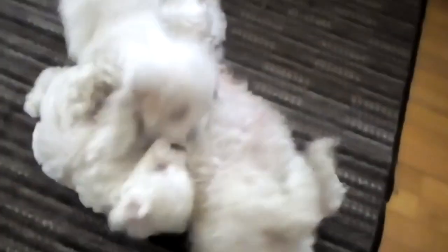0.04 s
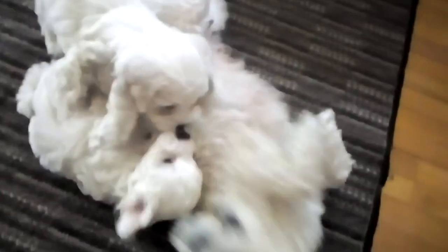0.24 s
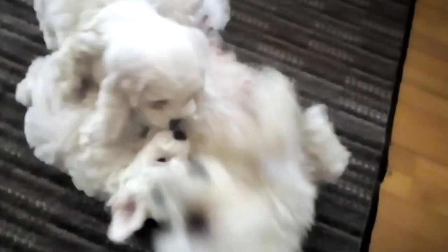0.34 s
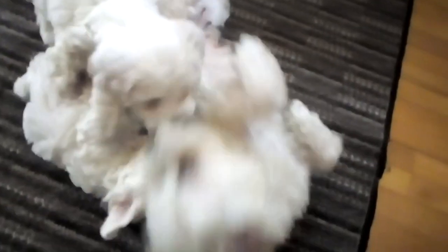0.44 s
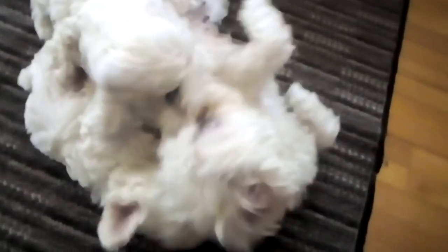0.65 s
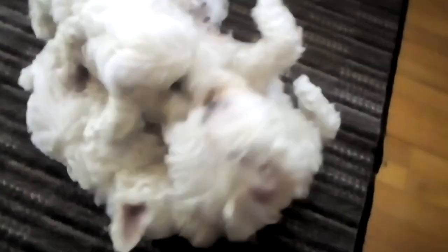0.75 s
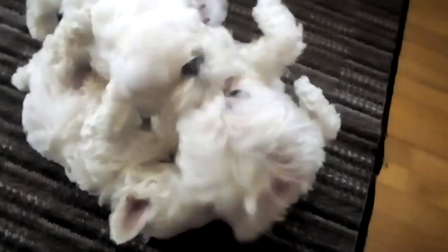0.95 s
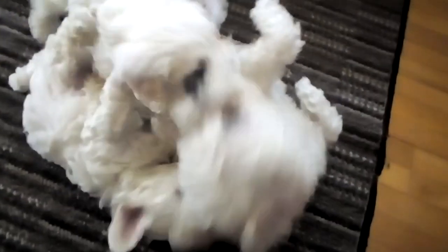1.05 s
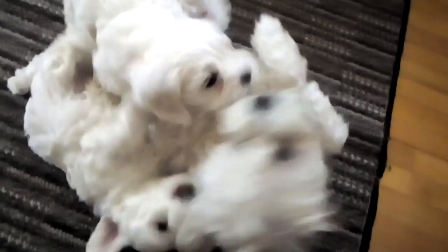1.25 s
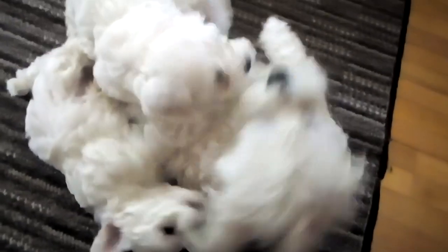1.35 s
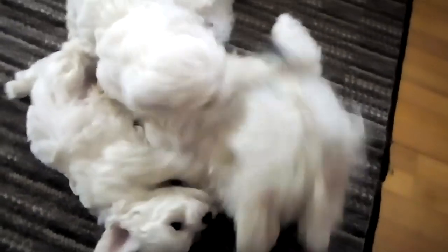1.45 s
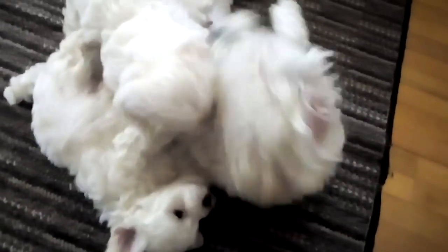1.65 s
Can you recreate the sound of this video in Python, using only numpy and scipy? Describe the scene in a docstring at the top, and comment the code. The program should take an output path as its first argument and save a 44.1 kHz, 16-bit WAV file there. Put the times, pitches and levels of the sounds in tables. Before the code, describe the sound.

Short, low snorting grunts from small dogs playing indoors, with faint sniffs and soft bumps.

```python
"""Snorting grunts of puppies wrestling close by, on a rug in a small room.
A fluttering palate chops rough throat pulses and rings the muzzle; the vocal tract filters them.
A nasal wheeze and snort pops go with the grunts; thin sniffs, ticks of teeth and claws and soft
body bumps sound around them. The walls add a short reverberation, over a quiet room hiss."""
import sys
import numpy as np
from scipy import signal
from scipy.fft import rfft, irfft
from scipy.io import wavfile
from scipy.ndimage import uniform_filter1d

SR = 44100
rng = np.random.default_rng(int(sys.argv[2]) if len(sys.argv) > 2 else 0)


def store_wav(level_fs):
    """Save 16-bit WAV to argv[1]."""
    pcm = np.round(np.clip(np.atleast_2d(level_fs), -1, 1) * 32767)
    wavfile.write(sys.argv[1], SR, pcm.T.astype(np.int16))


N = 74970
T = np.arange(N) / SR

SWELL_DB, SAG_SHARE, FRAY = 9.5, 0.3, 0.74  # as effort fades, pitch sags and pulse timing frays
FIRST_FLAP_SHARE, LOOSEN_S, FLAP_JITTER_S = 0.74, 0.1, 0.0005
JITTER_PERIODS, SCATTER_DB, AIR_DB = 0.12, 5.5, 1.5  # at roughness 1
CHEST_HZ, CHEST_WIDTH_HZ, THROAT_WIDTH_HZ, MOUTH_WIDTH_HZ, NASAL_WIDTH_HZ = 264.6, 93.4, 145, 360, 167
RING_TAU_S, RING_FADE_S, LOW_EDGE_HZ = 0.0016, 0.14, 96
# Grunts: t/s, swell/s, hold/s, release/s, level/dB, flutter/Hz, flap opening/s, pitch/Hz, roughness,
# chest/dB, throat/Hz, mouth/Hz, mouth/dB, muzzle ring/dB, top edge/Hz, nasal/Hz, nasal/dB
GRUNTS = [(-0.0215, 0.019, 0.0098, 0.022, -53.5, 46.38, 0.034, 231, 0.8, -2.5, 364, 850, -16.5, -14, 1150, 1860, -30),
          (0.2022, 0.0069, 0.023, 0.008, -47.5, 54.6, 0.023, 306.4, 0.8, -2.5, 480, 950, -8, -27, 1250, 1690, -25.5),
          (0.245, 0.0014, 0.024, 0.037, -45, 47.86, 0.025, 255.8, 0.83, 1, 460, 900, -7.5, -16.5, 1250, 2200, -24.5),
          (0.524, 0.024, .076, 0.025, -39, 48.36, 0.02, 239.8, 0.73, -2, 432, 659, -3.5, -1.5, 802, 1560, -31),
          (0.718, .02, 0.035, 0.021, -70, 46.9, .06, 341, 0.36, -3.5, 340, 650, -11, -23, 800, 1700, -38),
          (0.8271, 0.0033, .012, 0.024, -39, 46.08, 0.034, 223.8, 0.24, 3, 485, 790, -5, -13.5, 854, 1773, -23),
          (1.192, 0.0015, 0.013, 0.0033, -64, 46.3, 0.053, 165.6, 0.76, 6.5, 310, 650, -7.5, -26, 833, 1700, -38),
          (1.3262, 0.012, 0.0068, 0.023, -55.5, 48.76, .036, 249, 0.65, 5, 400, 676, -5, -26, 880, 1670, -46),
          (1.526, .002, 0.0033, 0.012, -67.5, 47, 0.016, 226.4, 0.55, 6, 290, 665, -16.5, -18, 790, 1740, -26)]
def grunt(start, swell, hold, release, db, flutter_hz, open_s, pitch_hz, rough,
          chest_db, throat_hz, mouth_hz, mouth_db, ring_db, edge_hz, nasal_hz, nasal_db):
    """Source and filter: pulses and air, gated by the palate, excite chest, throat, mouth and nose."""
    def effort(t):
        """Amplitude envelope: swell, hold, exponential release."""
        attack = undb(-SWELL_DB * np.clip(1 - (t - start) / swell, 0, 1) ** 2)
        return attack * np.exp(-np.maximum(t - start - swell - hold, 0) / release)
    def opening(age, t):
        """Valve action: the palate flies open and closes, more slowly as it loosens."""
        looseness = FIRST_FLAP_SHARE + np.clip((t - start) / LOOSEN_S, 0, 1)
        return np.exp(-(age / (open_s * looseness)) ** 2)
    pulses, muzzle = np.zeros(N), np.zeros(N)
    for k, chance in enumerate(rng.standard_normal((10, 16))):
        flap = start + k / flutter_hz + FLAP_JITTER_S * chance[0]
        push = effort(flap) * np.exp(-(flap - start) / RING_FADE_S)
        muzzle += push * ring(flap, mouth_hz * (1 + 0.054 * chance[1]), RING_TAU_S)
        slack = (1 - effort(flap)) * (flap > start + swell)
        jitter = (rough + FRAY * slack) * JITTER_PERIODS
        pulse_hz = pitch_hz * (1 - SAG_SHARE * slack)
        for j, (late, size) in enumerate(chance[2:].reshape(-1, 2)):
            age = (j + jitter * late) / pulse_hz
            at = flap + age
            if 0 <= at < T[-1] and age < 1 / flutter_hz:
                pulses[int(at * SR)] += effort(at) * opening(age, at) * undb(rough * SCATTER_DB * size)
    gate = (T > start) * effort(T) * opening((T - start) % (1 / flutter_hz), T)
    flow = unit(pulses) + rough * undb(AIR_DB) * unit(gate * noise())
    chest = undb(chest_db) * band(flow, CHEST_HZ, CHEST_WIDTH_HZ)
    throat = band(flow, throat_hz, THROAT_WIDTH_HZ)
    mouth = undb(mouth_db) * band(flow, mouth_hz, MOUTH_WIDTH_HZ)
    nose = undb(nasal_db) * steep(flow, nasal_hz, NASAL_WIDTH_HZ)
    body = edge(chest - throat + mouth, edge_hz, "low", order=6)
    body = edge(body, LOW_EDGE_HZ, "high", order=3)
    voice = unit(body + nose) + undb(ring_db) * unit(muzzle)
    peak_rms = np.sqrt(uniform_filter1d(voice ** 2, size=880).max())  # loudest 20 ms
    return undb(db) * voice / peak_rms


# Glide of the nasal resonance in the longest snort: t/s, f/Hz, level/dB
WHEEZE = [(0.552, 1530, -87), (0.592, 1680, -75.5), (0.624, 2037, -73), (0.669, 2130, -84),
          (0.72, 2130, -88)]
def wheeze(width_hz=170):
    """Narrow-band noise: a nasal resonance slides up as the snort tightens."""
    t, hz, db = np.array(WHEEZE).T
    phase = 2 * np.pi * np.cumsum(np.interp(T, t, hz)) / SR
    air = edge(noise() + 1j * noise(), width_hz / 2, "low", order=2)
    return unit((air * np.exp(1j * phase)).real) * np.interp(T, t, undb(db), left=0, right=0)


# Upper mouth resonances: f/Hz, relative level/dB
POP_OVERTONES = [(1730, -3.5), (2480, -15.5)]
# Snort pops: t/s, peak level/dB, f/Hz, time constant/s, overtone gain/dB
POPS = [(0.18, -51, 481, 0.00033, -13), (0.504, -48, 592, 0.0014, -25.5), (0.8035, -45.5, 757, 0.0021, -40),
        (0.8465, -28, 784, 0.0013, -20), (0.873, -36, 545, 0.00051, -12.5)]
def snort_pops(shortest_tau_s=0.0009):
    """Cavity resonance: the palate snaps at a grunt's start or within it, with a short hollow ring."""
    out = np.zeros(N)
    for t, db, hz, tau, overtone_db in POPS:
        tau = max(tau, shortest_tau_s)
        overtones = sum(undb(level) * ring(t, f, tau) for f, level in POP_OVERTONES)
        out += undb(db) * (ring(t, hz, tau) + undb(overtone_db) * overtones)
    return out


# Resonances of the nasal passage: f/Hz, bandwidth/Hz, relative level/dB
PASSAGE = [(1645, 470, -2.5), (2080, 230, -7.5), (2780, 530, -6), (3325, 720, -0.5), (4874, 1000, 4)]
# Sniffs and puffs: peak t/s, rise/s, fall/s, level/dB, nostril f/Hz, bandwidth/Hz, rush gain/dB
SNIFFS = [(0.005, 0.035, 0.052, -72.5, 5640, 1250, -6.5), (0.147, 0.03, 0.059, -66.5, 5810, 700, -8),
          (0.25, 0.095, 0.045, -69.5, 5390, 810, -10), (0.362, 0.013, 0.019, -75.5, 5500, 1200, -8),
          (0.488, .02, 0.047, -68.5, 5900, 400, -20), (0.612, 0.059, 0.051, -64.5, 5540, 1044, -2.5),
          (0.844, 0.011, 0.026, -75, 5420, 406, 1.5), (1.148, 0.012, 0.0084, -71.5, 5840, 614, -5.5),
          (1.21, 0.0073, 0.015, -79.5, 5900, 795, -12), (1.385, 0.019, 0.019, -72.5, 5850, 891, -5),
          (1.585, 0.051, 0.041, -71.5, 5800, 376, -2), (1.67, 0.025, 0.039, -74, 5760, 380, -2.5)]
def sniffs(flicker_db=1.5, flicker_hz=95):
    """Flow noise: air whistles in small nostrils over an unsteady rush through the nasal passage."""
    out = np.zeros(N)
    rush = unit(sum(undb(db) * unit(steep(noise(), hz, width_hz)) for hz, width_hz, db in PASSAGE))
    for t, rise, fall, db, hz, width_hz, rush_db in SNIFFS:
        swell = np.exp(-np.where(T < t, ((T - t) / rise) ** 2, (np.abs(T - t) / fall) ** 2.1))
        whistle = unit(steep(noise(), hz, width_hz))
        out += undb(db) * swell * (whistle + undb(rush_db) * rush)
    flicker = unit(edge(noise(), flicker_hz, "low", order=2))
    return out * undb(flicker_db * flicker)


# Contacts of teeth and claws: t/s, peak level/dB, f/Hz
TICKS = [(0.216, -58.5, 2120), (0.290, -60.5, 2160), (0.675, -53.5, 5440), (0.74, -60.5, 4810),
         (1.132, -54.5, 5650)]
def ticks(decay_s=0.0024, width_hz=1400):
    """Hard impact: each tiny contact gives a brief burst of band-limited noise."""
    out = np.zeros(N)
    for t, db, hz in TICKS:
        burst = noise() * (T >= t) * np.exp(-np.abs(T - t) / decay_s)
        tick = band(band(burst, hz, width_hz), hz, 2 * width_hz)
        out += undb(db) * tick / np.abs(tick).max()
    return out


# Body bumps: t/s, peak level/dB, f/Hz
BUMPS = [(0.0, -62, 142), (0.21, -57, 149), (0.294, -48.5, 149), (0.54, -62.5, 91), (0.627, -50.5, 157),
         (0.834, -62, 66), (0.873, -49.5, 159.5), (0.955, -60, 165.3), (1.2, -68, 136), (1.359, -67, 122),
         (1.545, -73.5, 171)]
def bumps(tau_s=0.0047):
    """Soft impact: bodies rolling on the rug give low, heavily damped thuds."""
    return sum(undb(db) * ring(t, hz, tau_s) for t, db, hz in BUMPS)


ROOM_T60_S, ROOM_DB, ROOM_DELAY_S, ROOM_BUILD_S = 0.16, -8, 0.0093, 0.0086
BASS_T60_S, BASS_EDGE_HZ, BASS_DB = 0.3, 500, -13
# Low room modes: f/Hz, bandwidth/Hz, gain/dB
ROOM_MODES = [(281, 10, 1.5), (359, 24, -3.5), (489, 22, -7.5)]
def room(x):
    """Reverberation: nearby walls add a short diffuse tail; the bass and a few modes ring on."""
    age = np.maximum(T - ROOM_DELAY_S, 0)
    def tail(t60):
        """Reflections of unit energy that build up and decay exponentially."""
        echoes = noise() * (1 - np.exp(-age / ROOM_BUILD_S)) * np.exp(-np.log(1000) * age / t60)
        return echoes / np.linalg.norm(echoes)
    walls = undb(ROOM_DB) * tail(ROOM_T60_S)
    bass = undb(BASS_DB) * edge(tail(BASS_T60_S), BASS_EDGE_HZ, "low", order=3)
    modes = sum(undb(db) * band(x, hz, width_hz) for hz, width_hz, db in ROOM_MODES)
    return x + modes + signal.fftconvolve(x, walls + bass)[:N]


# Room noise spectrum: f/Hz, relative spectral level/dB
NOISE_SPECTRUM = [(15, -14.5), (25, -10), (60, -3), (110, 2), (200, -0.5), (350, -5), (700, -8.5),
                  (1400, -13.5), (3500, -17.5), (5800, -16), (7800, -27), (13000, -31.5)]
def room_noise(level_db=-71.5, hiss_db=-78.5):
    """Stationary noise: a broad, dark spectrum and a faint, very high hiss."""
    hz, db = np.array(NOISE_SPECTRUM).T
    colour = undb(np.interp(np.log(np.fft.rfftfreq(N, 1 / SR) + 1), np.log(hz), db))
    hiss = steep(noise(), hz=16400, width_hz=1900)
    broadband = irfft(rfft(noise()) * colour, N)
    return undb(level_db) * unit(broadband) + undb(hiss_db) * unit(hiss)


def ring(start, hz, tau):
    """Damped oscillation, softly started: its envelope peaks at 1 after two time constants."""
    age = np.maximum(T - start, 0)
    return (age / tau / 2) ** 2 * np.exp(2 - age / tau) * np.sin(2 * np.pi * hz * age)


def band(x, hz, width_hz):
    """Second-order resonance, gain 1 at its centre."""
    return signal.lfilter(*signal.iirpeak(hz, hz / width_hz, fs=SR), x)


def steep(x, hz, width_hz):
    """Two equal resonances in cascade, for steeper skirts."""
    return band(band(x, hz, width_hz), hz, width_hz)


def edge(x, hz, kind, order):
    """Maximally flat low-pass or high-pass."""
    return signal.sosfilt(signal.butter(order, hz, kind, fs=SR, output="sos"), x)


def undb(db):
    """Decibels to amplitude ratio."""
    return 10 ** (np.asarray(db) / 20)


def unit(x):
    """Normalisation to rms 1."""
    return x / (np.std(x) + 1e-12)


def noise():
    """White noise."""
    return rng.standard_normal(N)


def scene():
    """Superposition: the puppies' sounds add and reverberate over the room noise."""
    puppies = sum(grunt(*row) for row in GRUNTS) + wheeze() + snort_pops() + bumps()
    puppies += edge(sniffs() + ticks(), hz=7100, kind="low", order=8)
    return (room(puppies) + room_noise())[None]


def record(dry, cutoff_hz=15500):
    """Band limiting: a steep elliptic low-pass removes the highest treble."""
    return signal.sosfilt(signal.ellip(10, 0.2, 70, cutoff_hz, fs=SR, output="sos"), dry)


dry = scene()
out = record(dry)
store_wav(out)
```